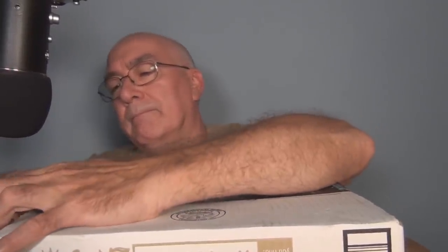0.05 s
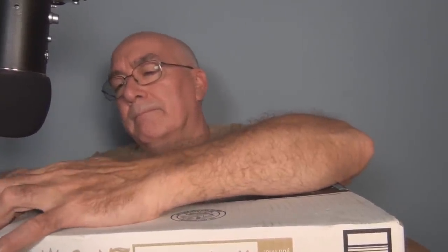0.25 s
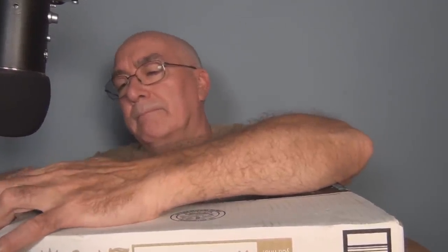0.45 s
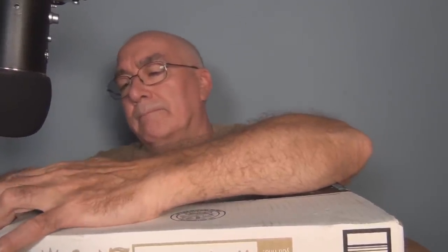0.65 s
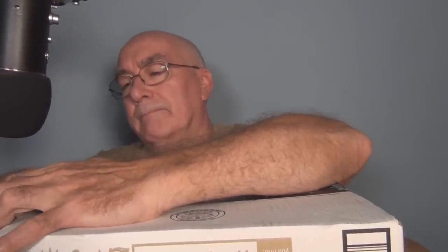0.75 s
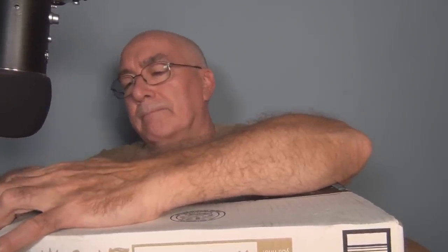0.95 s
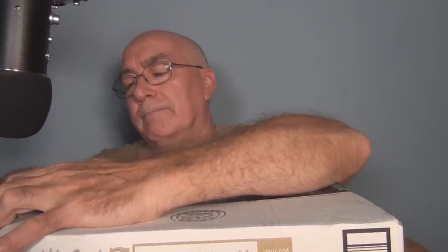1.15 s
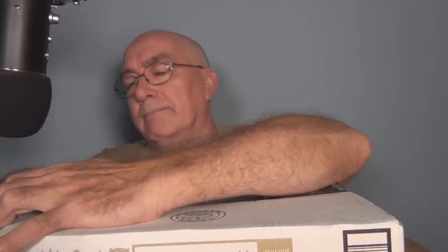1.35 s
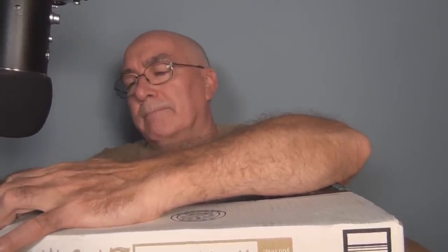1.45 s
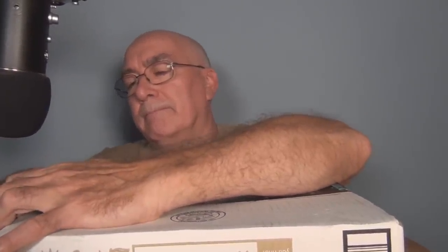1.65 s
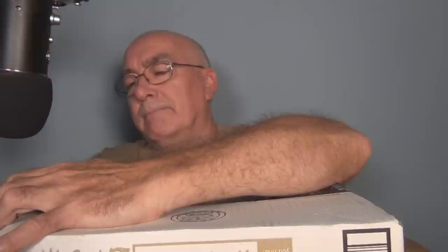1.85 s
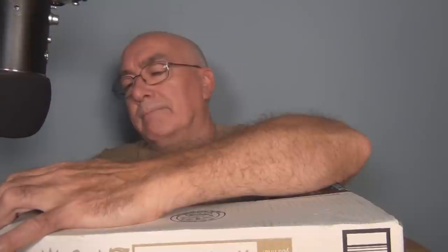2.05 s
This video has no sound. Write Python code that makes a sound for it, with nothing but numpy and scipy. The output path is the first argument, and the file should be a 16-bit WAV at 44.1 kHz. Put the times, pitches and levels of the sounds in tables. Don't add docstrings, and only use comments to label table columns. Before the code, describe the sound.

Fingertips on a hollow cardboard box, heard close in a quiet room. Faint rubbing, then the loudest thumps with nail clicks at 0.24-0.26 s. A softer tap cluster follows at 0.43-0.53. From 0.7 to 1.9, sparse light taps, sharp nail ticks, papery crackles and faint pad judders, notably around 1.45 and 1.6. A gentle tapping flurry comes at 1.98-2.06. Low hum and very faint high whine continue.

```python
import sys
import numpy as np
from scipy import signal
from scipy.fft import rfft, irfft
from scipy.io import wavfile
from scipy.ndimage import uniform_filter1d

SR = 44100
rng = np.random.default_rng(int(sys.argv[2]) if len(sys.argv) > 2 else 0)


def to_wav(sig):
    pcm = np.clip(np.atleast_2d(sig), -1, 1) * 32767
    pcm = np.round(pcm).astype(np.int16)
    wavfile.write(sys.argv[1], SR, pcm.T)


def voltage_ratio(level):
    return 10 ** (np.asarray(level, float) / 20)


N = 92610

# [t/s, thump level/dB, contact/ms, nail level/dB, place on the lid (-1 edge, 1 middle)]
TAPS = [(.0035, -39, 0.69, -40.5, -.8), (0.0644, -36, 2.8, -60, -0.52), (0.2406, -11.5, 3.25, -10.5, 0.044),
        (.2424, -6, 1.76, -20, 0.32), (0.2604, -9.5, 1.91, -40, 0.49), (.429, -35.5, 1.3, -53, 0.074),
        (0.4577, -20.5, 2.3, -20.5, -0.14), (0.4633, -13.5, 1.67, -42, -0.28),
        (0.4675, -23, 2.3, -45, -0.97), (0.489, -25.5, 2.1, -40, -0.7), (.498, -28, 2.6, -32, -0.39),
        (0.532, -62, 1.2, -29, 0.), (.615, -42.5, 0.79, -49, -0.5), (0.7254, -38, 2, -50, -0.48),
        (.756, -32, 4.8, -30, 0.039), (.823, -39.5, 3, -75, 0.3), (1.075, -41, 3.6, -58, 0.51),
        (1.221, -29.5, 0.67, -41, -0.79), (1.2251, -36, 1.3, -62, -0.49), (1.579, -39.5, 1.23, -64, -0.12),
        (1.776, -41, 2.9, -70, 0.46), (1.819, -40.5, 2.8, -65, 0.4), (1.8064, -40.5, 0.67, -57, -0.62),
        (1.882, -42, 0.47, -66, -0.18), (1.985, -32, 1.6, -41, -0.44), (2.005, -30, 0.96, -23, -0.59),
        (2.0077, -27.5, 2.6, -30.5, 0.46), (2.029, -29, 2.3, -58, -0.44), (2.0474, -23.5, 5.8, -51, .2),
        (2.055, -33, 1.7, -53, 0.33)]
LID_HZ = [105, 154, 209, 257, 308, 405, 472, 654, 712, 800, 1114]
# [level/dB, time to fall 60 dB/s, level gained towards the middle/dB]
LID_RINGS = [(-9.5, 0.245, -2), (-2, .06, -10), (-2.5, 0.078, 2.5), (4, 0.062, 7.5), (-4.5, 0.056, -6.5),
             (-3, 0.097, 6), (-12.5, 0.094, -6.5), (-11.5, 0.052, 4), (-9, 0.032, 8), (-18, .06, -6),
             (-29, 0.014, -4)]
# [f/Hz, level/dB, time to fall 60 dB/s]
SKIN = [(1200, -17, .01), (1600, -11, .012), (1950, -12, .025), (2400, 0, .012), (2720, -5, .014),
        (3300, -11, .007), (3890, -2, .012), (4800, -13, .007)]
# [t/s, peak level/dB, f/Hz, ring/ms]
TICKS = [
    (.7575, -28, 7650, 5.5),
    (.9012, -36, 8600, 2.9),
    (0.931, -26.5, 9400, 1.9),
    (0.9336, -40, 11000, 2.1),
    (1.0426, -29, 7300, 7.4),
    (1.071, -38, 7460, 4.5),
    (1.1083, -30.5, 7600, 7.8),
    (1.4541, -23.5, 6700, 1.9),
]
# [t/s, peak level/dB, f/Hz, length/ms]
CRACKLES = [(.0022, -46, 8100, 2.8), (0.0339, -45.5, 8400, 2.2), (.0645, -57, 8050, 2.6),
            (.2225, -44.5, 4200, 4.4), (.2392, -19, 6000, 3.9), (0.2467, -38, 5500, 8),
            (0.2574, -37, 5500, 5.5), (0.441, -48, 7000, 6.), (0.4553, -37.5, 7500, 3.8),
            (0.7108, -46, 7200, 6.), (0.742, -41, 7200, 3.2), (0.7495, -32.5, 7500, 3.3),
            (.757, -28, 8050, 1.8), (.762, -39, 7500, 2.1), (0.7653, -36, 7600, 2.4), (.777, -44, 8000, 3.),
            (.815, -52, 9000, 3.), (.975, -49, 6000, 1.6), (1.22, -46, 6000, 2.1),
            (1.2365, -40.5, 7400, 3.), (1.249, -48, 10000, 2.1), (1.2545, -49, 6300, 3.),
            (1.2605, -48, 7000, 1.6), (1.2635, -38, 7400, 1.4), (1.281, -46, 9500, 2.1),
            (1.289, -42, 6300, 3.6), (1.295, -48, 6300, 2.3), (1.2983, -34.5, 7000, 2.6),
            (1.303, -41, 6300, 4.5), (1.4073, -45, 9000, 3.3), (1.4185, -41, 7500, 2.6),
            (1.4318, -37, 6000, 3.3), (1.4425, -36, 8000, 3.5), (1.4515, -33.5, 6400, 5.7),
            (1.6395, -49, 7000, 3.), (1.648, -43, 7000, 3.6), (1.782, -54, 7000, 2.6),
            (1.803, -45, 7000, 2.4), (1.9523, -45.5, 7000, 2.8), (2.0036, -32.5, 5750, 5.7),
            (2.0285, -39, 6000, 3.), (2.0477, -34.5, 6500, 2.3), (2.0542, -38, 6100, 3.5)]
# [t/s, length/s, level/dB, f/Hz, rise of pitch (0-1)]
JUDDERS = [
    (0.812, 0.047, -47.5, 264.5, .05),
    (1.418, 0.021, -35.5, 236, 0.03),
    (1.439, .022, -35, 242, 0.22),
    (1.454, 0.038, -43, 248, 0.02),
    (1.601, .045, -33.5, 247, 0.55),
    (1.797, 0.058, -40.5, 262, 0.08),
]
# [t/s, length/s, scratch level/dB, rub level/dB, place of the peak (0-1)]
DRAGS = [(-.05, 0.077, -60, -37.5, 0.71), (0.023, 0.23, -74.5, -50.5, 0.19), (0.078, 0.23, -60, -43, 0.52),
         (0.24, 0.081, -40.5, -28, 0.11), (0.279, 0.2, -58, -38, 0.05), (0.419, 0.086, -48, -76, 0.55),
         (0.474, 0.15, -48, -42.5, 0.27), (0.541, 0.22, -60.5, -44.5, 0.35),
         (0.672, 0.082, -57.5, -42, 0.44), (0.725, 0.12, -54.5, -43.5, 0.1), (0.77, 0.32, -70.5, -60, 0.24),
         (0.866, 0.18, -64, -45.5, 0.44), (1.045, 0.085, -64, -49.5, 0.53),
         (1.164, 0.11, -63.5, -48.5, 0.53), (1.205, 0.17, -59.5, -46, 0.44),
         (1.385, 0.093, -49.5, -56, 0.51), (1.434, .11, -60.5, -48, 0.31), (1.536, 0.19, -66, -47.5, 0.44),
         (1.619, 0.17, -57.5, -50.5, 0.32), (1.756, 0.11, -61, -47, 0.53),
         (1.878, 0.17, -60.5, -44.5, 0.54), (1.959, 0.16, -52.5, -40, 0.38),
         (2.076, 0.074, -47.5, -36, 0.48)]
# [f/Hz, level/dB]
SCRATCH_COLOUR = [(290, 13.5), (500, 2), (1530, -2.5), (1870, -6), (2650, -10.5), (3340, -10.5),
                  (5240, -11), (9630, -17), (16000, -19.5)]
# [f/Hz, width/Hz, level/dB]
SCRATCH_HUMPS = [(2510, 1400, -3), (5230, 430, -7.5), (7000, 860, -2.5), (10000, 2100, -5)]
# [f/Hz, level/dB]
PAPER_COLOUR = [(500, 2), (900, -17), (1700, 7), (2600, -6), (5000, -59)]
# [f/Hz, level/dB]
ROOM_COLOUR = [(12, 0), (20, 0), (256, -11.5), (357, -22.5), (421, -17), (693, -29), (6910, -43.5),
               (15000, -44.5)]
# [f/Hz, rms level/dB]
WHINE = [(15627, -78.5), (15679, -77.5)]
# [f/Hz, share of moments (0-1)]
SIDE_DROPS = [(100, .75), (600, .5), (1300, .75), (2200, .65), (3000, .5), (4000, .2), (5000, 0)]

GRIT_PER_S = 5000


def evened(x):
    return x / np.sqrt(np.mean(x ** 2) + 1e-20)


def peaked(x):
    return x / abs(x).max()


def above(x, hz):
    return signal.lfilter(*signal.butter(2, hz, "high", fs=SR), x)


def below(x, hz, order):
    return signal.lfilter(*signal.butter(order, hz, fs=SR), x)


def around(x, hz, sharpness):
    return signal.lfilter(*signal.iirpeak(hz, sharpness, SR), x)


def coloured(x, points):
    f, db = np.transpose(points)
    bins = np.fft.rfftfreq(len(x), 1 / SR)
    gain = voltage_ratio(np.interp(np.log(bins + 1), np.log(f), db))
    return irfft(rfft(x) * gain, len(x))


def humped(x, humps):
    return x + sum(voltage_ratio(db) * 2 * around(x, hz, hz / width) for hz, width, db in humps)


def add(mix, s, sound):
    part = mix[max(round(s * SR), 0):][:len(sound)]
    part += sound[:len(part)]


def ring(modes):
    t = np.arange(SR // 4) / SR
    return sum(voltage_ratio(db - 60 * t / max(t60, .005)) * np.sin(2 * np.pi * hz * t) for hz, db, t60 in modes)


def radiated(x):
    return above(np.gradient(x), 145)


def grit(per_s, spread_db):
    size = voltage_ratio(spread_db * np.minimum(rng.exponential(1, N), 4)) * rng.standard_normal(N)
    return evened(size * (rng.random(N) < per_s / SR))


def pressure(column):
    t, power = np.arange(N) / SR, np.zeros(N)
    for row in DRAGS:
        start, length, peak_place = row[0], row[1], np.clip(row[4], .05, .95)
        u = np.clip((t - start) / length, 0, 1) ** (np.log(.5) / np.log(peak_place))
        power += (voltage_ratio(row[column]) * np.sin(np.pi * u) ** 2.02) ** 2
    return np.sqrt(power)


def taps():
    nail_lead_s, crack_ms, crack_db, strike = .0011, 2.2, -14.5, 3
    out, t = np.zeros(N), np.arange(2000) / SR
    noises = rng.standard_normal((len(TAPS), len(t)))
    detunes = rng.uniform(-0.76, 1, (len(TAPS), len(SKIN)))
    for (s, thump_db, contact_ms, nail_db, place), noise, detune in zip(TAPS, noises, detunes):
        u = t * 3000 / max(contact_ms, .2)
        push = (u * np.exp(1 - u)) ** 2
        lid = [(hz, db + place * lean_db, t60) for hz, (db, t60, lean_db) in zip(LID_HZ, LID_RINGS)]
        thump = radiated(signal.fftconvolve(ring(lid), push))
        add(out, s, voltage_ratio(thump_db) * peaked(thump))

        burst = noise * voltage_ratio(-60 * t * 1000 / (4 * crack_ms)) * np.minimum(t / 0.0006, 1) ** 2
        burst += strike * (t == t[30])
        skin = [(hz * (1 + 0.02 * a), db, t60) for (hz, db, t60), a in zip(SKIN, detune)]
        nail = signal.fftconvolve(ring(skin), burst)
        crack = above(coloured(burst, SCRATCH_COLOUR), 970)
        add(out, s - nail_lead_s, voltage_ratio(nail_db) * peaked(nail))
        add(out, s - nail_lead_s, voltage_ratio(nail_db + crack_db) * peaked(crack))
    return out


def ticks():
    sharpness_per_ms, snap = .5, 3.5
    out, t = np.zeros(N), np.arange(1200) / SR
    for (s, db, hz, ring_ms), noise in zip(TICKS, rng.standard_normal((len(TICKS), len(t)))):
        fade = voltage_ratio(-60 * t * 1000 / (2 * ring_ms)) + 0.046 * voltage_ratio(-60 * t / 0.05)
        kick = noise * fade + snap * 2 * (t == 0)
        tick = around(kick, hz, sharpness_per_ms * ring_ms) + 0.086 * np.diff(kick, prepend=0)
        add(out, s, voltage_ratio(db) * peaked(tick))
    return out


def crackles():
    out, t = np.zeros(N), np.arange(1200) / SR
    for (s, db, hz, length_ms), noise in zip(CRACKLES, rng.standard_normal((len(CRACKLES), len(t)))):
        u = t * 3000 / max(length_ms, .5)
        wake = 0.1 * np.minimum(u, 1) * voltage_ratio(-60 * t / 0.085)
        puff = noise * (u * np.exp(1 - u) + wake)
        puff = above(around(puff, hz, 1.3), 2900)
        add(out, s, voltage_ratio(db) * peaked(puff))
    return out


def judders():
    out = np.zeros(N)
    for s, length, db, hz, rise in JUDDERS:
        u = np.arange(0, length, 1 / SR) / length
        turn = 2 * np.pi * np.cumsum(hz * (1 + rise * (u - .5))) / SR
        tone = np.sin(turn) + 0.13 * np.cos(2 * turn)
        add(out, s, voltage_ratio(db) * np.sin(np.pi * u) ** 1.7 * tone)
    return out


def scratch():
    grit_share = .5
    slips = grit_share * grit(GRIT_PER_S, 2.5) + (1 - grit_share) * rng.standard_normal(N)
    waver_db = 1.84 * evened(uniform_filter1d(rng.standard_normal(N), 250))
    hiss = coloured(slips * voltage_ratio(waver_db), [(200, 0)] + list(SCRATCH_COLOUR))
    return 2.147 * pressure(column=2) * evened(humped(hiss, SCRATCH_HUMPS))


def rub():
    shudder_hz, shudder_db, paper_db, sway_db = 109.8, -4, -21, -9
    press = pressure(column=3)
    slips = evened(below(grit(1500, 1.7), 930, order=1)) * press
    lid = radiated(ring([(hz, db, t60) for hz, (db, t60, _) in zip(LID_HZ, LID_RINGS)]))
    box = ring([(shudder_hz, 0, .15), (1.483 * shudder_hz, -4, .1)])
    body = lid / np.linalg.norm(lid) + voltage_ratio(shudder_db) * box / np.linalg.norm(box)
    ringing = 0.19 * signal.fftconvolve(slips, body)[:N]
    paper = voltage_ratio(paper_db) * evened(coloured(grit(GRIT_PER_S, 1.5), PAPER_COLOUR)) * press
    sway = evened(below(rng.standard_normal(N), 57.4, order=2))
    sway = voltage_ratio(sway_db) * sway * uniform_filter1d(press, size=4000)
    return sway + paper + ringing


def tail(x):
    level_db, t60_s = -15, 0.091
    t = np.arange(SR // 3) / SR
    noise = signal.lfilter([.3], [1, -.7], rng.standard_normal(len(t)))
    echo = noise * voltage_ratio(-60 * t / t60_s) * np.minimum(t / 0.00052, 1)
    return voltage_ratio(level_db) * signal.fftconvolve(above(x, 537), echo / np.linalg.norm(echo))[:N]


def room():
    room_db = -52
    t = np.arange(N) / SR
    whine = sum(np.sqrt(2) * voltage_ratio(db) * np.sin(2 * np.pi * hz * t) for hz, db in WHINE)
    hum = evened(coloured(rng.standard_normal(N), list(ROOM_COLOUR) + [(15300, -72)]))
    return voltage_ratio(room_db) * hum + whine


def scene():
    hand = taps() + ticks() + crackles() + judders() + scratch() + rub()
    mono = hand + tail(hand) + room()
    return np.array([mono, np.roll(mono, 1)])


def thinned(side):
    hz, t, z = signal.stft(side, SR, "cosine", 2048, 1024)
    band = (hz // 340).astype(int)
    f, share = np.transpose(SIDE_DROPS)
    luck = uniform_filter1d(rng.standard_normal((len(t), band.max() + 1)), size=3, axis=0)
    rank = luck.argsort(0).argsort(0) / len(t)
    kept = rank.T[band] >= np.interp(hz, f, share)[:, None]
    return signal.istft(z * kept, SR, "cosine", 2048, 1024)[1][:N]


def low_pass(x):
    return signal.sosfilt(signal.butter(12, 16500, fs=SR, output="sos"), x)


def record(dry):
    lowpass = signal.firwin(401, 15880, window=("kaiser", 7), fs=SR)
    x = signal.oaconvolve(dry, lowpass[None], "same")
    mid = x.mean(0)
    side = thinned((x[0] - x[1]) / 2)
    return low_pass(np.array([mid + side, mid - side]))


dry = scene()
out = record(dry)
to_wav(out)
```